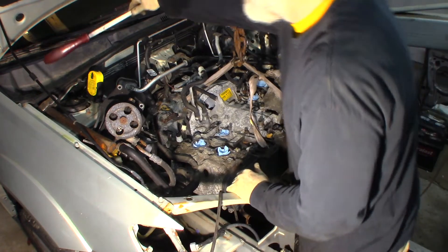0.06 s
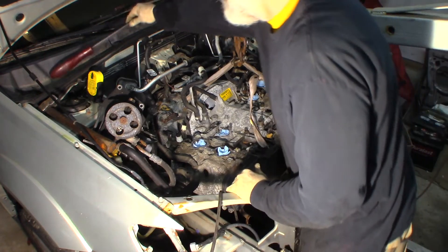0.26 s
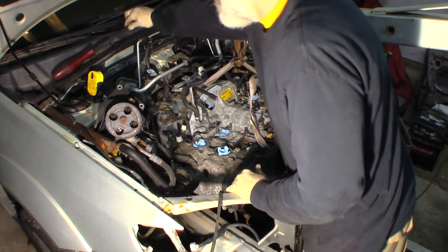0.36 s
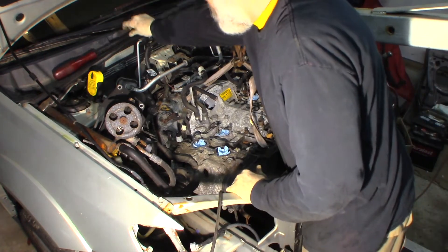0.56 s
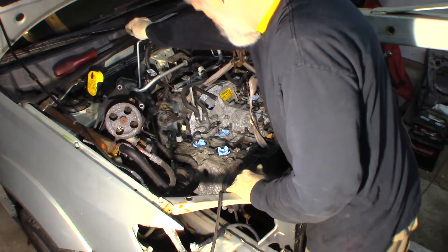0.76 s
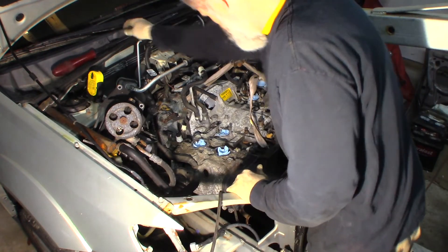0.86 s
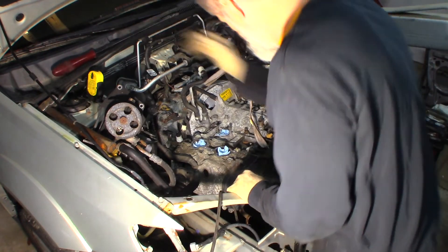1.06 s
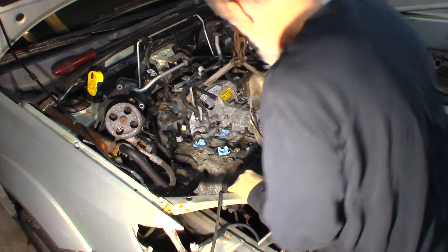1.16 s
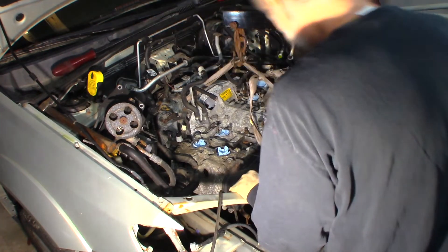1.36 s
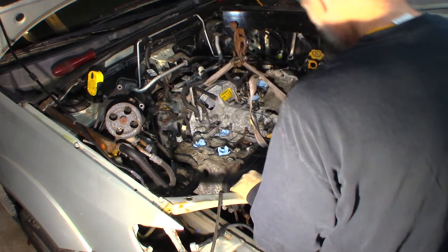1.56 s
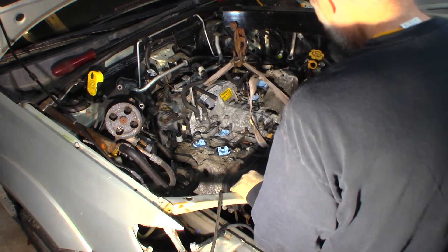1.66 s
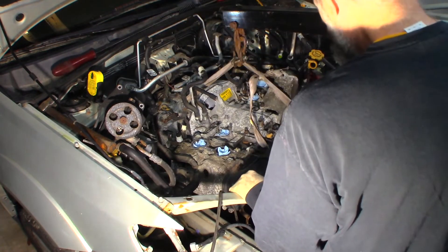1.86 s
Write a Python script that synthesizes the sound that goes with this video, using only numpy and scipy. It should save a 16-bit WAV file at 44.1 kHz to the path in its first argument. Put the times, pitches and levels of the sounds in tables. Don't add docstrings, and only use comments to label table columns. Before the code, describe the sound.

Loud metal bar drop on sheet metal, several quick weaker knocks, a brief sleeve swish, then a dull bump, light hook and chain clinks and shoe scuffs, recorded close in stereo with a short workshop reverb.

```python
import sys
import numpy as np
from scipy import signal
from scipy.fft import rfft, irfft, next_fast_len
from scipy.io import wavfile
from scipy.ndimage import uniform_filter1d

SR = 44100
rng = np.random.default_rng(int(sys.argv[2]) if len(sys.argv) > 2 else 0)


def boost_factor(decibels):
    exponent = np.asarray(decibels, float) / 20
    return 10 ** exponent


def waveform_to_disk(signal):
    frames = np.transpose(np.atleast_2d(signal))
    scaled = np.clip(frames, -1, 1) * 32767
    samples = np.round(scaled).astype(np.int16)
    wavfile.write(sys.argv[1], SR, samples)


N = 83790

# frequency_hz, density_db_per_hz
HUM_SPECTRUM = [(15, -38), (25, 6), (354, -11.5), (476, -3.5), (1330, -11), (1650, -13), (1940, -13.5),
                (8590, -22.5), (16000, -37)]
# peak_s, half_length_s, level_db
SWISHES = [
    (0.023, 0.1, -53),
    (0.934, 0.047, -45.5),
    (0.86, 0.028, -58),
    (1.12, 0.072, -53.5),
    (1.228, 0.029, -56),
]
# frequency_hz, density_db_per_hz
CLOTH_SPECTRUM = [(1470, -5), (2500, -2), (3730, -7.5), (5800, -1.5), (6260, -3.5), (8260, -10),
                  (15800, -23)]
# peak_s, half_length_s, level_db
NYLON_STROKES = [
    (0.909, 0.025, -45),
    (0.873, .03, -57),
    (.04, 0.047, -58),
]
# frequency_hz, density_db_per_hz
NYLON_SPECTRUM = [(3000, -30), (5000, -1.5), (8000, 0.5), (11000, -8), (15800, -14)]
# peak_s, half_length_s, level_db
SHUFFLES = [
    (.08, 0.033, -52),
    (1.25, 0.031, -57.5),
    (1.62, 0.056, -48.5),
    (1.85, 0.079, -48.5),
]
# frequency_hz, density_db_per_hz
SCUFF_SPECTRUM = [(150, -9), (450, -9), (750, -4.5), (1400, -29), (4000, -35.5), (9000, -50)]
# start_s, level_db, centre_hz
SNAPS = [(.2348, -19.5, 393), (0.2344, -37, 2870), (.2404, -46.5, 4440), (0.4472, -40, 1380),
         (.5960, -40.5, 4020), (0.5963, -36, 1314), (0.5974, -28, 290), (0.6437, -29.5, 1340),
         (1.333, -49, 340), (1.3503, -58, 4600), (1.4521, -46, 3470), (1.6796, -45.5, 1770),
         (1.7846, -50, 3430)]

# start_s, level_db, hardness_db, rise_s
COWL_BLOWS = [(.2350, -3.5, -4, 0.00024), (.2520, -14, -7.5, 0.0013), (.2950, -19.5, 5.5, 0.0025),
              (.3820, -23.5, 0, 0.00096), (.4459, -24, 0.5, 0.00024), (.4778, -34.5, 10.5, 0.00068),
              (.5591, -30, 0.5, 0.0014), (.5965, -15, 0.5, 0.00012), (.6434, -22, 7, 0.00033),
              (.6600, -11.5, -4, 0.0087), (.6900, -31, 7.5, 0.014), (.7400, -29, 5, 0.0023),
              (.8140, -34.5, 7, 0.0096), (.8620, -25.5, -5.5, 0.002), (.9300, -46, 17.5, 0.0044)]
# pitch_hz, level_db, t60_s
COWL_MODES = [(122.7, -15, 0.64), (147.5, -14, 0.58), (197.2, -14, 0.52), (236, -9, 0.15),
              (270.8, -6, 0.17), (301.3, -4, 0.23), (367, -29, 0.17), (402.6, -11.5, 0.36),
              (503, -12.5, 0.3), (608.7, -15.5, 0.38), (780, -9.5, 0.26), (950, -12, 0.11),
              (675, -14, 0.35), (1294, -25.5, 0.4)]
# frequency_hz, density_db_per_hz
COWL_DENSE = [(50, -46), (90, -18), (165, -14.5), (270, -3.5), (420, -14.5), (900, -22.5), (4800, -43.5),
              (9500, -56.5), (12500, -81), (15500, -85)]
# frequency_hz, t60_s
COWL_FADE = [(100, 0.27), (500, 0.3), (3000, 0.32), (12000, 0.35)]
# clear_db, crowded_db, bunching_db (crowd gathered round the clear modes)
COWL_MIX = (-5, -2.5, -18.5)
# start_s, level_db, treble_tilt_db, length_s
CRACKS = [(0.2351, -23, 1, 0.0018), (0.241, -26, -1, .002), (0.309, -38.5, 17, 0.0026),
          (0.38, -42, 2, 0.0018), (0.446, -38, -3, 0.0022), (0.454, -51, 2, 0.0025),
          (0.478, -38, 4.5, .003), (0.4814, -44, 0, .002), (0.51, -49, 13, .004), (.5240, -50, 10, 0.005),
          (.5590, -39, 8, 0.0022), (0.57, -46, 4, .002), (0.597, -21.5, -4.5, 0.0014),
          (0.643, -26, -4, 0.0027), (0.67, -34, -4, 0.0026), (0.715, -46, 1, .003), (.8194, -46, 3, .002),
          (.8464, -41, 4, .003), (1.149, -52, 3, .002), (1.173, -45, -3, .002), (1.3466, -46, 2, .002),
          (1.3525, -42, 3, 0.0027), (1.451, -33, 7, 0.007), (1.523, -42.5, 15, .015),
          (1.677, -46, -4, 0.0037), (1.792, -45, -3, .003)]
# frequency_hz, density_db_per_hz
CRACK_SPECTRUM = [(500, -32), (1200, 0.5), (4200, 3.5), (7000, -10), (10000, -13.5), (12000, -26),
                  (16000, -45)]
# frequency_hz, t60_s
SHOP_FADE = [(150, 0.49), (1500, 0.83), (10000, 0.17)]

# start_s, level_db, hardness_db, rise_s
ZIP_TICKS = [
    (1.1503, -51, 4.5, 0.00023),
    (1.1707, -38.5, -1.5, 0.00016),
]
# pitch_hz, level_db, t60_s
ZIP_MODES = [(4730, -1, 0.13), (5760, -4, 0.025), (6960, 4, 0.029)]
# frequency_hz, density_db_per_hz
ZIP_DENSE = [(2500, -33.5), (4500, 8), (7300, 3), (9000, -33), (15000, -40)]
# start_s, level_db, hardness_db, rise_s
WING_BUMPS = [
    (1.332, -40, 4.5, 0.0067),
    (1.349, -33.5, 4, 0.0017),
    (1.358, -27, -8, 0.0062),
    (1.452, -37, -19, .003),
    (1.54, -48, -19, 0.0073),
    (1.685, -49, 9, 0.0071),
]
# pitch_hz, level_db, t60_s
WING_MODES = [(206.9, -4, 0.26), (237, -4.5, 0.081), (340, -32, 0.089), (499, -3, 0.21), (780, -13.5, .09),
              (1560, -13, 0.098), (4620, -20, 0.11)]
# frequency_hz, density_db_per_hz
WING_DENSE = [(47, -67), (80, -47), (197, -4.5), (300, -16), (487, -14.5), (4410, -35.5), (15500, -66)]
# frequency_hz, t60_s
WING_FADE = [(200, 0.2), (4000, 0.22)]
# clear_db, crowded_db, bunching_db
WING_MIX = (-0.5, 0, 10.5)

# start_s, level_db, hardness_db, rise_s
HOOK_HITS = [
    (1.4521, -22.5, 2, 0.00082),
    (1.487, -21, -10.5, 0.00082),
    (1.522, -37.5, 7, 0.00065),
    (1.59, -38, -1, 0.0016),
]
# pitch_hz, level_db, t60_s
HOOK_MODES = [(1264, -4, 0.24), (1363, -7.5, 0.36), (1670, -10, 0.27), (2240, -3.5, 0.12),
              (8700, -17, 0.17), (3270, -7, 0.18), (3366, 2, 0.14), (3540, 0, 0.12), (5134, -6.5, 0.24),
              (5730, -32, .3), (6200, -3, 0.43), (7380, -17, 0.71), (7800, -31, 0.28), (13570, -18, .1)]
# frequency_hz, density_db_per_hz
HOOK_DENSE = [(180, -11), (300, -8.5), (454, -12), (711, -6.5), (3440, -17), (4480, -20), (6350, -15),
              (14100, -39.5), (15800, -67)]
# frequency_hz, t60_s
HOOK_FADE = [(800, 0.4), (4000, 0.46), (12000, 0.3)]
# clear_db, crowded_db, bunching_db
HOOK_MIX = (-10, -10, 2)
# start_s, level_db, hardness_db, rise_s
LINK_HITS = [
    (1.6790, -30, -3.5, 0.00019),
    (1.778, -47, -22, .003),
    (1.7848, -33.5, -15.5, 0.0016),
    (1.86, -51.5, -2, 0.0086),
]
# pitch_hz, level_db, t60_s
LINK_MODES = [(11400, -12, 0.15), (1357, -24, .3), (9370, -8, 0.3), (1715, -4, 0.17), (2560, 3.5, 0.1),
              (3430, -4, 0.29), (3590, -4.5, 0.86), (5286, -4.5, 0.7), (5870, 1, 0.32), (6370, 0, 0.39),
              (6430, 1, 0.42), (7110, 1, 0.36), (8130, -1, 0.26), (8900, -7, 0.15)]
# frequency_hz, density_db_per_hz
LINK_DENSE = [(180, -39), (300, -9), (398, -37), (447, -27), (1380, 0.5), (4870, -23), (6240, -23),
              (11900, -24), (15800, -48)]
# clear_db, crowded_db, bunching_db
LINK_MIX = (-10, -5, 2)
# frequency_hz, side_under_mid_db
SIDE_LEVEL = [(30, -11), (80, -41.5), (350, -33.5), (700, -20), (1400, -19), (2800, -14), (8000, -18),
              (13000, -25)]

PIVOT_HZ = 684
BUNCH_WIDTH = 0.035
WANDER = 17.4


def unit(x):
    return x / np.sqrt(np.mean(x ** 2) + 1e-20)


def along(points, hz):
    f, value = np.transpose(points)
    return np.interp(np.log(hz + 1), np.log(f + 1), value)


def filtered(x, response):
    size = next_fast_len(x.shape[-1] + 8192)
    spectrum = rfft(x, size) * response(np.fft.rfftfreq(size, 1 / SR))
    return irfft(spectrum, size)[..., :x.shape[-1]]


def colour(points):
    return lambda hz: boost_factor(along(points, hz)) * (hz > points[0][0] / 2)


def shop_hum():
    noise = filtered(rng.standard_normal((2, N)), colour(HUM_SPECTRUM))
    return boost_factor(-52.5) * unit(noise)


def rubbing(strokes, spectrum, grain_db):
    t = np.arange(N) / SR
    power = sum(boost_factor(2 * db) * np.exp(-((t - s) / half) ** 2) for s, half, db in strokes)
    roughness = uniform_filter1d(rng.standard_normal(N), size=150)
    grain = boost_factor(grain_db * unit(roughness))
    noise = filtered(grain * rng.standard_normal((2, N)), colour(spectrum))
    return np.sqrt(power) * unit(noise)


def sleeve_swishes():
    return rubbing(SWISHES, CLOTH_SPECTRUM, grain_db=1.8)


def nylon_hiss():
    return rubbing(NYLON_STROKES, NYLON_SPECTRUM, grain_db=2.0)


def foot_shuffles():
    return rubbing(SHUFFLES, SCUFF_SPECTRUM, grain_db=1.5)


def snaps():
    out, t = np.zeros((2, N)), np.arange(SR // 50) / SR
    peak_s, q = 0.001, 1.1
    for s, db, hz in SNAPS:
        def band(f):
            damping = 1j * f * hz / q
            resonance = damping / (hz ** 2 - f ** 2 + damping)
            return 2 * resonance ** 2 / (1 + (f / 9000) ** 4)

        pulse = t / peak_s * np.exp(1 - t / peak_s)
        source = rng.standard_normal((2, len(t))) + 2 * np.sin(2 * np.pi * hz * t)
        burst = unit(filtered(pulse * source, band))
        out[:, round(s * SR):][:, :len(t)] += boost_factor(db) * burst
    return out


def dying(fade, size):
    hz, t, bins = signal.stft(rng.standard_normal((2, size)), SR, nperseg=256)
    t60 = np.maximum(along(fade, hz), 0.01)[:, None]
    return signal.istft(bins * boost_factor(-60 * t / t60), SR, nperseg=256)[1][:, :size]


def struck(hits, modes, dense, fade, mix_db):
    clear_db, crowded_db, bunching_db = mix_db
    out, t = np.zeros((2, N + SR)), np.arange(SR // 2) / SR
    hz, level_db, t60 = np.transpose(modes)[:, :, None]
    walk = np.cumsum(rng.standard_normal((len(modes), len(t))), axis=1)
    drift = WANDER * np.sqrt(hz / 3000 / SR) * walk
    rings = boost_factor(level_db - 60 * t / t60) * np.sin(2 * np.pi * hz * t + drift)
    envelope = colour(dense)
    loud = np.sqrt(np.mean(envelope(np.fft.rfftfreq(4096, 1 / SR)) ** 2))

    def crowd_shape(f):
        bunches = np.sum(boost_factor(level_db) / (1 + ((f / hz - 1) / BUNCH_WIDTH) ** 2), axis=0)
        return envelope(f) * (1 + boost_factor(bunching_db) * bunches)

    for s, db, hard_db, rise in hits:
        def bright(f):
            return boost_factor(hard_db * f ** 2 / (f ** 2 + PIVOT_HZ ** 2))

        mid_weights = boost_factor(rng.normal(0, 1.5, len(modes)))
        weights = np.array([mid_weights, rng.standard_normal(len(modes))])
        clear = (weights * bright(hz[:, 0])) @ rings
        crowd = filtered(dying(fade, size=len(t)), lambda f: crowd_shape(f) * bright(f) / loud)
        sound = boost_factor(crowded_db) * crowd + boost_factor(clear_db) * clear
        onset = 1 - np.exp(-t / abs(rise))
        out[:, round(s * SR):][:, :len(t)] += boost_factor(db) * sound * onset
    return out[:, :N]


def bar_on_cowl():
    return struck(COWL_BLOWS, COWL_MODES, COWL_DENSE, COWL_FADE, COWL_MIX)


def cracks():
    out, t = np.zeros((2, N)), np.arange(SR // 20) / SR - 0.001
    for s, db, tilt_db, length in CRACKS:
        def response(f):
            tilt = boost_factor(tilt_db * np.log2((f + 1) / 4000) / 2)
            return colour(CRACK_SPECTRUM)(f) * tilt

        fade = np.exp(-t / abs(length)) * (t > 0)
        burst = filtered(fade * rng.standard_normal((2, len(t))), response)
        level = boost_factor(db) * np.sqrt(np.mean(fade ** 2))
        out[:, round((s + t[0]) * SR):][:, :len(t)] += level * unit(burst)
    return out


def shop_answer(x):
    out, step = np.zeros((2, N + 2 * SR)), round(0.3 * SR)
    delay = round(0.012 * SR)
    for start in range(0, N, step):
        tail = dying(SHOP_FADE, size=SR // 2)
        tail = tail / np.linalg.norm(tail[0])
        wet = signal.fftconvolve(x[None, start:start + step], tail, axes=1)
        out[:, start + delay:][:, :wet.shape[1]] += wet
    return boost_factor(-12) * out[:, :N]


def zip_ticks():
    return struck(ZIP_TICKS, ZIP_MODES, ZIP_DENSE, [(5000, 0.083)], (-6, -6, -20))


def body_on_wing():
    return struck(WING_BUMPS, WING_MODES, WING_DENSE, WING_FADE, WING_MIX)


def hoist_hook():
    return struck(HOOK_HITS, HOOK_MODES, HOOK_DENSE, HOOK_FADE, HOOK_MIX)


def chain_links():
    return struck(LINK_HITS, LINK_MODES, LINK_DENSE, HOOK_FADE, LINK_MIX)


def scene():
    metal = bar_on_cowl() + body_on_wing() + hoist_hook() + chain_links() + zip_ticks() + snaps()
    metal_cut_hz = 70
    metal = filtered(metal, lambda hz: (1j * hz / (metal_cut_hz + 1j * hz)) ** 2)
    friction = sleeve_swishes() + nylon_hiss() + foot_shuffles()
    mid, side = metal + shop_answer(metal[0]) + shop_hum() + friction + cracks()
    side = filtered(side, lambda hz: boost_factor(along(SIDE_LEVEL, hz)))
    return np.array([mid + side, mid - side])


def low_pass(x):
    return signal.sosfilt(signal.butter(12, 16470, fs=SR, output="sos"), x)


def record(dry):
    low_cut_hz, roll_off_hz, top_hz = 61.7, 14000, 16100
    ceiling = 1.1

    def microphone(hz):
        low_cut = (1j * hz / (low_cut_hz + 1j * hz)) ** 4
        return low_cut / (1 + (hz / roll_off_hz) ** 6)

    cut = filtered(dry, microphone)
    held = cut / (1 + np.abs(cut / ceiling) ** 4) ** 0.25
    mix = filtered(held, lambda hz: hz < top_hz)
    return low_pass(mix)


dry = scene()
out = record(dry)
waveform_to_disk(out)
```